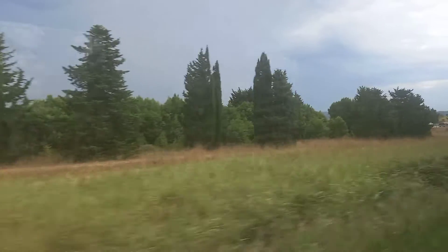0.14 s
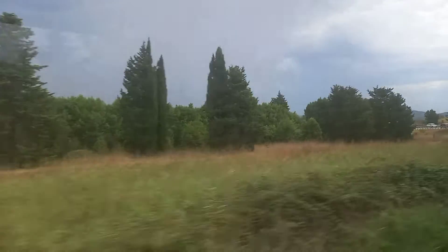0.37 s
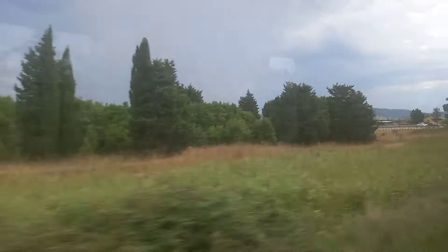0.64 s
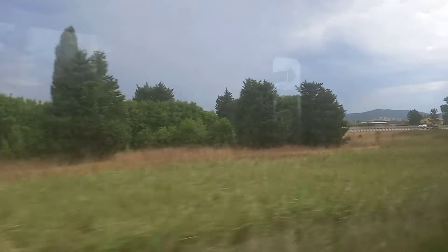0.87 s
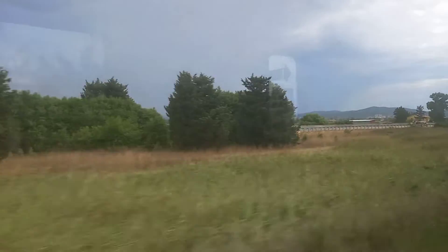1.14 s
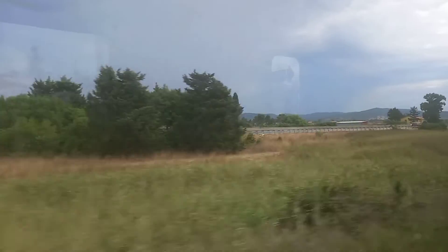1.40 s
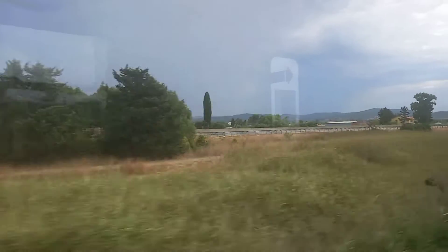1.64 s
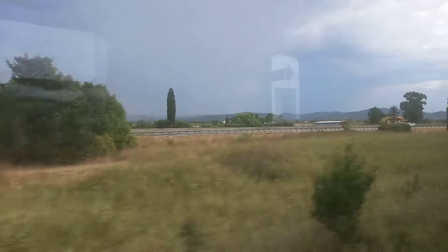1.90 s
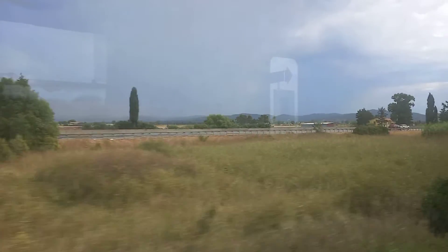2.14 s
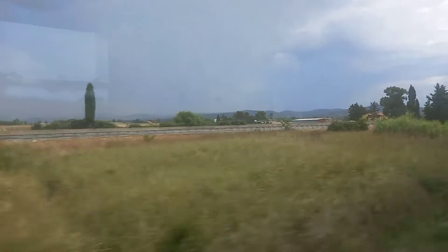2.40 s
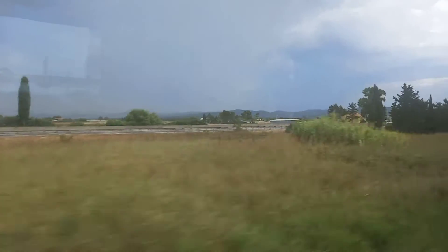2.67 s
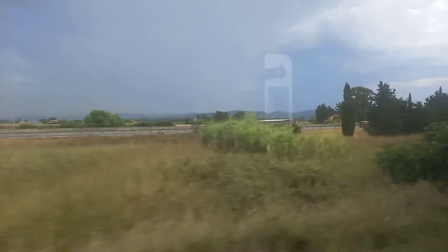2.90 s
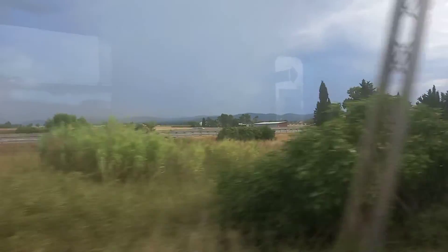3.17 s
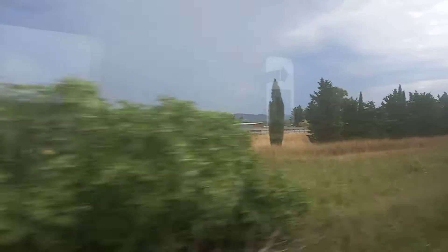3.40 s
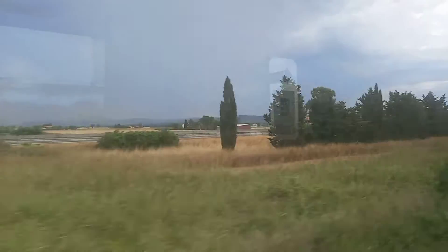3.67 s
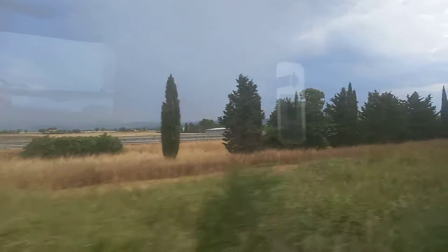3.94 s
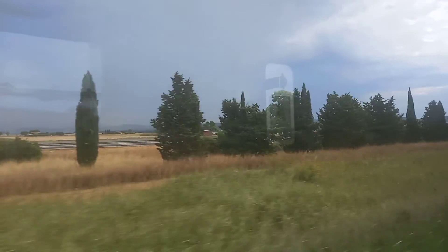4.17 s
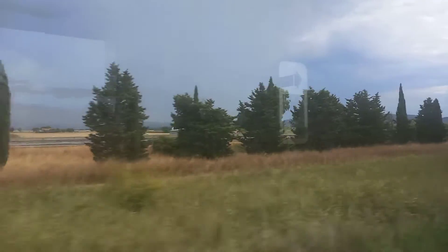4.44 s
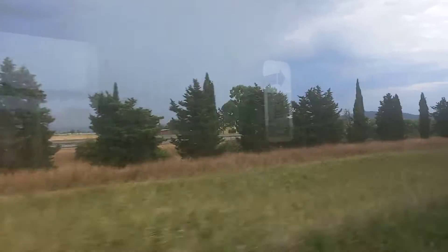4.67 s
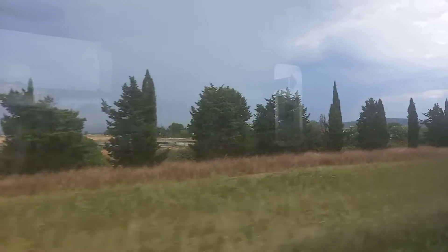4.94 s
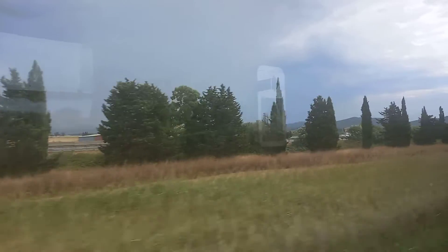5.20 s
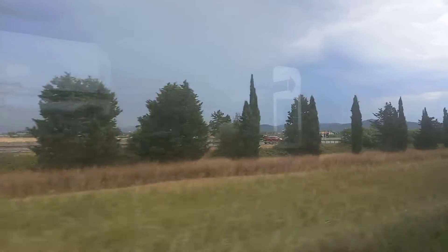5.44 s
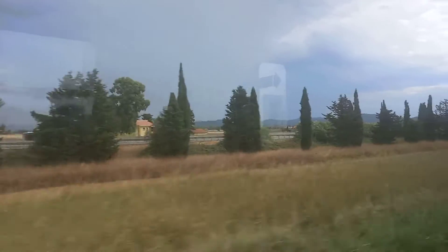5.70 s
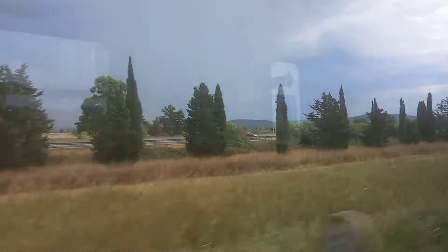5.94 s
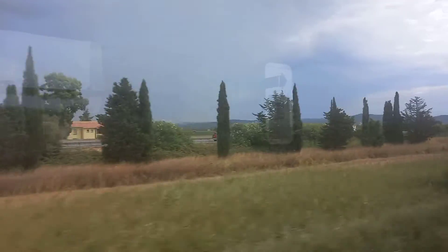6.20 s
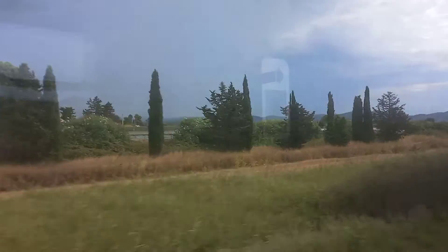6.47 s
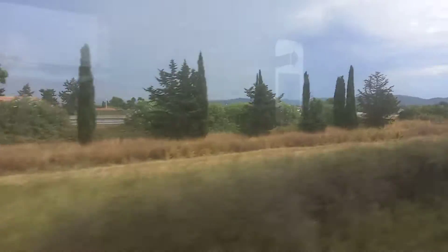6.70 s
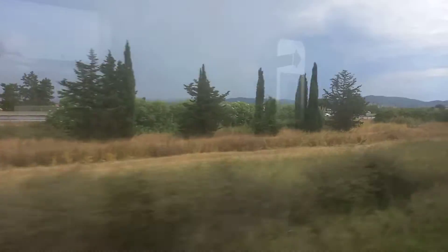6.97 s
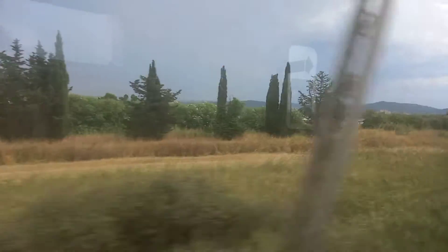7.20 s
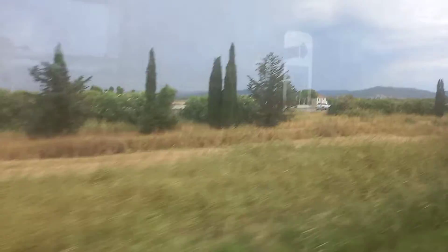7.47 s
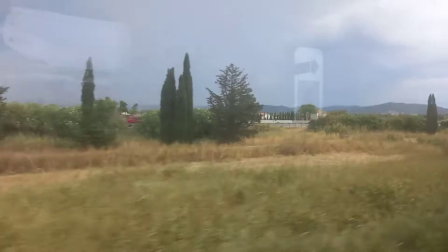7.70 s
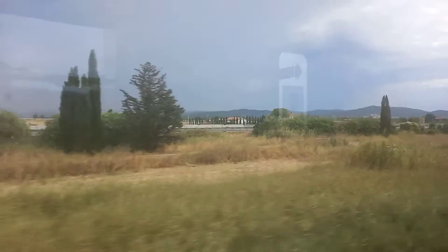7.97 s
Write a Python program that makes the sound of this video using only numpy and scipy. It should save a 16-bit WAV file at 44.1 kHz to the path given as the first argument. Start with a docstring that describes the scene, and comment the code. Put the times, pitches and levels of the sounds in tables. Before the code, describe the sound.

Inside a fast train carriage, a steady deep rumble with wavering low hums, soft airy hiss, loose trim rattling, and a loud phone knock near the end.

```python
"""Passenger carriage at speed

Inside a carriage on open track, heard by a hand-held phone near the window through its two ports.
Filtered noise makes the wheels' roar, their ring, the rush from the trackside and the air at the seals.
Narrow wavering resonances make the boom and hums of the car body. Jolts shake loose fittings into bursts
of dense clicks with small metal pings, and harder parts clack as short noise strikes.
Late on a finger ticks and knocks on the phone itself: tiny wave packets, a falling thud and a sharp edge.
"""
import sys
import numpy as np
from scipy import signal
from scipy.fft import rfft, irfft, next_fast_len
from scipy.io import wavfile
from scipy.ndimage import uniform_filter1d

SR = 44100
rng = np.random.default_rng(int(sys.argv[2]) if len(sys.argv) > 2 else 0)


def store_pcm(level_fs):
    """Save levels as 16-bit WAV."""
    pcm = np.round(np.clip(level_fs, -1, 1) * 32767).astype(np.int16)
    wavfile.write(sys.argv[1], SR, np.atleast_2d(pcm).T)


def boost_factor(decibels):
    """Convert a level in decibels to a linear amplitude factor."""
    exponent = np.asarray(decibels, float) / 20
    return 10 ** exponent


N = 357210
SIZE = next_fast_len(N)
HZ = np.maximum(np.arange(SIZE // 2 + 1) * SR / SIZE, 1)
T = np.arange(N) / SR

# How the two ports share a sound. Each row: frequency in Hz, left minus right in dB.
PORT_BALANCE = [(50, .5), (150, 0), (300, 1.5), (480, 4), (650, 5), (1000, -4), (1400, -1.5), (2100, 4.5),
                (3200, -0.5), (4600, -7.5), (5800, 3.5), (7600, 17), (8700, -5.5), (9100, -16.5),
                (10200, -20.5), (10800, -18.5), (15000, -18.5)]
# How alike the ports hear it. Each row: frequency in Hz, likeness from 0 to 1, left lead in radians.
PORT_LIKENESS = [(50, .995, .16), (75, .995, .12), (200, .98, .01), (310, .92, 0), (480, .85, -.35),
                 (650, .3, -.5), (900, 0, -.5)]

# Low boom of the car body. Each row: time in seconds, level in dB before its random drift.
BOOM_LEVEL = [(0.0, -25), (.35, -23.5), (1.0, -22.5), (2.21, -22.5), (2.26, -24.5), (2.36, -17),
              (2.56, -30.5), (2.78, -20.5), (3.06, -29.5), (3.17, -12), (3.23, -28), (4.04, -21.5),
              (4.18, -29.5), (4.24, -17.5), (4.32, -30.5), (4.77, -21), (4.83, -31), (5.3, -25),
              (6.34, -30.5), (6.52, -17.5), (6.67, -39), (6.78, -22.5), (7.3, -25.5), (7.54, -31.5),
              (7.81, -20.5), (7.85, -30.5)]
# Resonance of the boom: frequency in Hz, width in Hz.
BOOM_RESONANCE = (70.7, 16)
# Body hums. Each row: time in seconds, then low floor hum, high floor hum and wall drone in dB before drift.
HUM_LEVELS = [(0, -36, -29.5, -34.5), (1.83, -31, -38.5, -34.5), (2.5, -29.5, -35.5, -28),
              (2.9, -32.5, -29, -23.5), (3.3, -32.5, -29, -23), (3.5, -22, -31.5, -27),
              (3.88, -24.5, -25.5, -27), (4.2, -19, -23, -28.5), (4.37, -24, -36, -29),
              (4.45, -31, -30.5, -23.5), (5.05, -29, -35.5, -26.5), (5.2, -20.5, -28, -29),
              (5.33, -28.5, -23.5, -30), (5.8, -20, -25.5, -34), (6.0, -32, -26.5, -33.5),
              (6.15, -24.5, -21, -29), (6.38, -18, -22, -27), (6.6, -27.5, -23.5, -30.5),
              (7.08, -24.5, -18.5, -26), (7.2, -25.5, -25.5, -29.5), (7.87, -25, -29, -36),
              (8.1, -23.5, -29.5, -34.5)]
# Their resonances, in that order. Each row: frequency in Hz, width in Hz, evenness of swing from 0 to 1.
HUM_RESONANCES = [(229, 12, .7), (249, 7, .8), (283, 60, .15)]
HUM_WAVER = .005  # share by which the hums' pitch wanders
# A panel hums for a while. Each row: start in seconds, end in seconds, top level in dB,
# frequency in Hz, width in Hz.
PANEL_HUMS = [(2.944, 3.297, -30.5, 416, 25), (7.4, 7.802, -31.5, 368, 14)]

# Spectrum of the roar under the boom and hums. Each row: frequency in Hz, relative density in dB per Hz.
ROAR_SPECTRUM = [(26, -25.5), (40, -4), (65, -2.5), (110, -3), (185, -5), (250, -2), (340, -8.5),
                 (480, -12.5), (750, -15.5), (1050, -24), (1500, -32), (2500, -35.5), (3200, -46),
                 (4000, -59.5)]
# Panel resonances in the roar. Each row: frequency in Hz, width in Hz, dB above the noise around them.
PANEL_RESONANCES = [(408.9, 8.3, 7.5), (475, 17, 5), (719, 12, 3)]
ROAR_FLOOR_DB = -23
# Roar by the other ways in. Each row: time in seconds, through the walls in dB, through the window in dB.
ROAR_LEVELS = [(0, -33, -36.5), (.8, -28.5, -34.5), (1.5, -28, -35), (2.45, -29, -37), (2.65, -30, -33),
               (3.2, -31, -35.5), (3.5, -30, -37), (4.24, -31.5, -36.5), (4.74, -28, -35.5),
               (5.57, -29.5, -36), (6.2, -30.5, -35.5), (6.6, -29.5, -36.5), (7.5, -30, -34.5),
               (8.1, -30.5, -34.5)]

# Spectrum of the wheels' ring. Each row: frequency in Hz, relative density in dB per Hz.
WHEEL_SPECTRUM = [(1300, -3.5), (1680, -7), (1800, 1), (2130, 2.5), (2300, -5), (2750, -9.5), (3300, -26.5)]
# Resonances of the wheels. Each row: frequency in Hz, width in Hz, dB above the noise around them.
WHEEL_RESONANCES = [(2070, 35, 4.5), (2690, 80, 3.7)]
# Level of the ring, which rush and draught follow. Each row: time in seconds, level in dB.
WHEEL_LEVEL = [(0, -43.5), (1.4, -43.5), (2.45, -44.5), (2.7, -43.5), (3.2, -40.5), (3.5, -46), (4.2, -45),
               (5.5, -45.5), (5.75, -46), (6.2, -43), (6.5, -46), (7.3, -45.5), (7.7, -43.5), (8.1, -47)]
# Drift of the ring between the ports, used about its mean. Each row: time in seconds, left minus right in dB.
WHEEL_BALANCE = [(0.0, 1.5), (1.2, 5), (2.9, 2.5), (5.2, 4), (8.1, 0.5)]

# Spectrum of the trackside rush. Each row: frequency in Hz, relative density in dB per Hz.
RUSH_SPECTRUM = [(1000, -1.5), (2600, -0.5), (3300, -1.5), (5000, -5), (6900, -14.5), (8600, -31)]
# Growth close to the track throws back more rush. Each row: start in seconds, end in seconds, lift in dB.
TRACKSIDE_GROWTH = [(2.55, 3.264, 1.5), (6.1, 6.4, 1), (7.58, 7.94, 1)]
# Spectrum of the air at the seals. Each row: frequency in Hz, relative density in dB per Hz.
DRAUGHT_SPECTRUM = [(6000, -0.5), (8600, -2.5), (11800, 1.5), (13000, -3.5), (13500, -7), (15600, -9)]
# Base levels at time zero, and follow in dB per dB of wheel ring about its mean.
RUSH_DB, RUSH_FOLLOW, RUSH_FADE_DB_PER_S = -45.5, 0.43, 0.32
DRAUGHT_DB, DRAUGHT_FOLLOW, DRAUGHT_FADE_DB_PER_S = -68.5, .5, 0.3

# Jolts that shake the fittings. Each row: time in seconds, drive of the bright part in dB,
# dull part above the bright in dB.
JOLTS = [(0.3476, -66.5, 9), (0.5307, -69.5, 4), (0.667, -56, 7.5), (0.85, -56.5, 9), (1.0994, -68.5, 12),
         (1.172, -67.5, -2), (1.874, -69, 5), (2.036, -68.5, 10), (2.236, -56.5, 9), (2.419, -58, 8.5),
         (2.545, -68.5, 9), (3.064, -66, 7.5), (3.125, -67, 7), (3.26, -73.5, 5), (4.292, -68.5, 4),
         (4.37, -67, 4), (4.4074, -69, 9.5), (4.458, -72.5, 4.5), (4.542, -72.5, 4), (4.66, -66.5, 11.5),
         (4.714, -62, 9), (4.827, -65, 8.5), (5.116, -63, 10), (6.231, -64.5, 8.5), (6.33, -68.5, 8),
         (6.411, -64.5, 9), (6.5934, -65.5, 13), (6.76, -64.5, 7.5), (7.283, -69, 5)]
# Bright part of the rattle. Each row: frequency in Hz, relative density in dB per Hz.
BRIGHT_SPECTRUM = [(7000, -12.5), (9000, -3.5), (11700, -0.5), (13600, -4.5), (15100, -4), (16000, -1.5)]
# Dull part of the rattle. Each row: frequency in Hz, relative density in dB per Hz.
DULL_SPECTRUM = [(1500, -18), (3000, -2), (4700, 8), (6000, 5), (7100, 3.5), (8600, -18.5)]
JOLT_S = 0.04  # the main shaking falls faster after this; the faint chatter builds at this pace
LINGER, LINGER_S = 0.14, 0.34  # faint chatter that goes on: share of the drive, decay in seconds
JOLT_COLOUR_DB = 1.8  # each jolt favours other parts
# Small metal parts ringing out of the chatter. Each row: start in seconds,
# envelope peak at the louder port in dB, frequency in Hz.
METAL_PINGS = [(0.699, -52, 11350), (0.714, -44, 5950), (0.863, -54, 12200), (4.663, -58, 11000),
               (5.117, -48, 6600)]
PING_S = .0035  # a ping swells for this long and decays at the same pace

# Single hard strikes. Each row: start in seconds, strength in dB before the strike envelope.
STRIKES = [(3.83, -31.5), (5.116, -29.5), (5.688, -33), (5.739, -28), (6.339, -29), (6.709, -30.5)]
# Spectrum of a strike. Each row: frequency in Hz, relative density in dB per Hz.
STRIKE_SPECTRUM = [(1100, -9.5), (2100, 6.5), (2800, 2.5), (3600, -4.5), (4700, -4), (6000, -11),
                   (7500, -14), (8300, -25), (12000, -37.5)]

# Fingernail ticks. Each row: centre in seconds, peak at the right port in dB, frequency in Hz.
NAIL_TICKS = [(7.5707, -39, 11500), (7.5895, -24, 14200), (7.6117, -46, 12500)]
# Knock on the case near the left port. Each row: start in seconds, left strength in dB before its envelope,
# starting pitch in Hz, time to fall by 60 dB in seconds.
CASE_KNOCK = [(7.9105, 7.5, 98, .085)]
# Sharp edge of the knock. Each row: peak time in seconds, right peak in dB before rounding,
# time constant of the rise in seconds.
KNOCK_SNAP = [(7.9157, -3, .0006)]
# The case rings at the snap: frequency in Hz, spread in seconds, left peak in dB.
CASE_RING = (1300, .0006, -26)


def on_hz(table, column=1):
    """A column of a frequency table, joined on a log axis."""
    rows = np.array(table, float)
    return np.interp(np.log(HZ), np.log(rows[:, 0]), rows[:, column])


def colour(table, peaks=()):
    """Gain over frequency: a spectrum closed at both ends, with resonances on top."""
    below, above = (table[0][0] * .7, -90), (table[-1][0] * 1.1, -90)
    gain = boost_factor(on_hz([below, *table, above]))
    for hz, width, db in peaks:
        gain = gain * boost_factor(db / (1 + (2 * (HZ - hz) / width) ** 2))
    return gain


def curves(table):
    """The columns of a time table, one value a sample."""
    s, *columns = np.transpose(table)
    return [np.interp(T, s, column) for column in columns]


def unit(x):
    """Scale to rms 1."""
    return x / np.sqrt(np.mean(x ** 2))


def walk(rate):
    """Slow random drift of rms 1, from random steps at the given rate in Hz, smoothed twice."""
    k = int(SR / rate)
    steps = np.repeat(rng.standard_normal(N // k + 1), k)
    smooth = uniform_filter1d(uniform_filter1d(steps, k), k)
    return unit(smooth[:N])


def ports(a, b, gain):
    """Two unrelated fields reach the ports: shared in the bass, separate in the treble, each port coloured."""
    like = on_hz(PORT_LIKENESS)
    ratio = boost_factor(on_hz(PORT_BALANCE)) ** 2
    mid = rfft(a, SIZE) * np.sqrt((1 + like) / 2)
    side = rfft(b, SIZE) * np.sqrt((1 - like) / 2)
    lead = np.exp(1j * on_hz(PORT_LIKENESS, column=2))
    left = (mid + side) * np.sqrt(ratio / (1 + ratio)) * lead
    right = (mid - side) / np.sqrt(1 + ratio)
    pair = irfft(np.array([left, right]) * gain, SIZE)[:, :N]
    return pair / np.sqrt(np.mean(pair.mean(axis=0) ** 2))  # the mean of the ports has rms 1


def noise(gain, flicker_db, rate):
    """Octave bands of noise, each flickering on its own."""
    out = 0
    for hz in 30 * 2. ** np.arange(10):
        band = np.cos(np.clip(np.log2(HZ / hz), -1, 1) * np.pi / 2) * gain
        if np.max(band) > np.max(gain) / 300:  # skip bands too faint to matter
            power = np.sqrt(np.sum(band ** 2))
            flicker = boost_factor(flicker_db * walk(rate))
            out = out + power * flicker * ports(*rng.standard_normal((2, N)), band)
    return out / np.sqrt(np.mean(out.mean(axis=0) ** 2))


def mode(hz, width, steady):
    """A resonance kept ringing by rail roughness: the pitch wavers, the swing is fairly even."""
    response = 1 / (1 + (2 * (HZ - hz) / width) ** 2)
    ring = irfft(rfft(rng.standard_normal(SIZE)) * response, SIZE)
    swing = np.abs(signal.hilbert(unit(ring)))
    return unit(ring / (swing + 0.069) ** np.clip(steady, 0, 1))[:N]


def growth_db():
    """Lift of the rush where growth stands close to the track, with soft edges."""
    edge_s = 0.031
    return sum(db / 2 * (np.tanh((T - start) / edge_s) - np.tanh((T - end) / edge_s))
               for start, end, db in TRACKSIDE_GROWTH)


def draught():
    """Air at the seals: fluttering high noise that rises and falls with the wheel ring."""
    wheel_db, = curves(WHEEL_LEVEL)
    swell_db = wheel_db - wheel_db.mean()
    air_db = DRAUGHT_DB + DRAUGHT_FOLLOW * swell_db - DRAUGHT_FADE_DB_PER_S * T + .6 * growth_db()
    return boost_factor(air_db) * noise(colour(DRAUGHT_SPECTRUM), flicker_db=2.1, rate=18)


def rush():
    """Rolling noise thrown back by the trackside, following the wheel ring and the growth outside."""
    wheel_db, = curves(WHEEL_LEVEL)
    swell_db = wheel_db - wheel_db.mean()
    rush_db = RUSH_DB + RUSH_FOLLOW * swell_db - RUSH_FADE_DB_PER_S * T + growth_db()
    return boost_factor(rush_db) * noise(colour(RUSH_SPECTRUM), flicker_db=1.3, rate=10)


def body():
    """The car body booms low down; floor, walls and panels hum at their own pitches."""
    boom_db = curves(BOOM_LEVEL)[0] + 1.5 * walk(12)
    pair = [boost_factor(boom_db) * mode(*BOOM_RESONANCE, steady=0.7) for _ in range(2)]
    for db, (hz, width, even) in zip(curves(HUM_LEVELS), HUM_RESONANCES):
        db = db + 0.78 * walk(2.98)
        # read faster or slower: the pitch wanders
        place = np.arange(N) + np.cumsum(HUM_WAVER * walk(4))
        pair = [x + boost_factor(db) * np.interp(place, np.arange(N), mode(hz, width, steady=even), period=N)
                for x in pair]
    for start, end, db, hz, width in PANEL_HUMS:
        swell = np.sin(np.pi * np.clip((T - start) / (end - start), 0, 1)) ** .5
        pair = [x + boost_factor(db) * swell * mode(hz, width, steady=0.57) for x in pair]
    return ports(*pair, 1) * np.sqrt(np.mean(pair[0] ** 2))


def roar():
    """Wheel on rail: the floor carries the deep roar, the walls its middle, the glass lets its upper part in."""
    wall_db, pane_db = curves(ROAR_LEVELS)
    # crossovers an octave-half wide, as angles: cosine keeps what lies below, sine what lies above
    wall, pane = (np.clip(2 * np.log2(HZ / hz), 0, 1) * np.pi / 2 for hz in (300, 540))
    deep = colour(ROAR_SPECTRUM) * np.cos(wall)
    panelled = colour(ROAR_SPECTRUM, PANEL_RESONANCES)
    out = boost_factor(ROAR_FLOOR_DB) * noise(deep, flicker_db=1.0, rate=7)
    out = out + boost_factor(wall_db) * noise(panelled * np.sin(wall) * np.cos(pane), flicker_db=0.7, rate=8)
    return out + boost_factor(pane_db) * noise(panelled * np.sin(pane), flicker_db=0.88, rate=8)


def wheels():
    """The wheels' ring: resonant noise that slowly leans from port to port."""
    wheel_db, = curves(WHEEL_LEVEL)
    lean_db, = curves(WHEEL_BALANCE)
    ring = boost_factor(wheel_db) * noise(colour(WHEEL_SPECTRUM, WHEEL_RESONANCES), flicker_db=0.8, rate=8)
    return ring * boost_factor(np.outer([.5, -.5], lean_db - lean_db.mean()))


def jolt_shake(s):
    """Shaking after a jolt: most of it stops at once, a fainter part lingers in the carriage."""
    t = np.maximum(T - s + 0.0047, 0)  # the shaking sets in just ahead of the listed time
    after = np.maximum(t - JOLT_S, 0)
    stop = np.exp(-after / 0.042) + 0.2 * np.exp(-after / 0.11)
    shake = (1 - np.exp(-t / 0.0082)) * np.exp(-t / 0.052) * stop
    return shake + LINGER * (1 - np.exp(-t / JOLT_S)) * np.exp(-t / LINGER_S)


def rattles():
    """Each jolt sets loose trim chattering: dense uneven clicks that start fast and die in the carriage."""
    shapes = [jolt_shake(s) for s, _, _ in JOLTS]
    bright = np.array([boost_factor(db) * shape for (_, db, _), shape in zip(JOLTS, shapes)])
    dull = np.array([boost_factor(db + dull_db) * shape for (_, db, dull_db), shape in zip(JOLTS, shapes)])
    # noise whose strength jumps every 30 samples
    jumps_db = 1.5 * rng.exponential(size=(2, N // 30 + 1)).repeat(30, axis=1)[:, :N]
    hits = rng.standard_normal((2, N)) * boost_factor(jumps_db)
    out = 0
    for shakes, gain in (bright, colour(BRIGHT_SPECTRUM)), (dull, colour(DULL_SPECTRUM)):
        # parts of every size chatter unevenly, each in its own time: third-octave bands
        for hz in 2000 * 2 ** np.arange(0, 3.2, 1 / 3):
            band = np.cos(np.clip(3 * np.log2(HZ / hz), -1, 1) * np.pi / 2) * gain
            share = np.sqrt(np.sum(band ** 2) / np.sum(gain ** 2))
            if share > .05:
                shake = boost_factor(JOLT_COLOUR_DB * rng.standard_normal(len(JOLTS))) @ shakes
                out = out + share * shake * boost_factor(2.2 * walk(70)) * ports(*hits, band)
    return out


def pings():
    """Small metal parts ring: a sine that swells and dies in milliseconds, quieter at one port."""
    out = 0
    for s, db, hz in METAL_PINGS:
        t = np.maximum(T - s, 0)
        ring = boost_factor(db) * t / PING_S * np.exp(1 - t / PING_S) * np.sin(2 * np.pi * hz * t)
        lean_db = on_hz(PORT_BALANCE)[int(hz * SIZE / SR)]
        out = out + np.outer([boost_factor(min(lean_db, 0)), boost_factor(min(-lean_db, 0))], ring)
    return out


def clacks():
    """A harder part strikes once: noise with a sharp start and a short tail."""
    fade = np.zeros(N)
    for s, db in STRIKES:
        t = np.abs(T - s)
        fade += boost_factor(db) * (T > s) * (0.35 * np.exp(-t / 0.0078) + 0.12 * np.exp(-t / 0.06))
    strikes = fade * rng.standard_normal((2, N))
    return ports(*strikes, colour(STRIKE_SPECTRUM)) * np.sqrt(np.mean(fade ** 2))


def nail_ticks():
    """Fingernail ticks: tiny bell-shaped packets of a high cosine."""
    return sum(boost_factor(db) * np.exp(-((T - s) / .00008) ** 2) * np.cos(2 * np.pi * hz * (T - s))
               for s, db, hz in NAIL_TICKS)


def case_knock():
    """The case is pushed in over milliseconds, then swings out ever slower as the finger loads it."""
    (s, db, hz, t60), = CASE_KNOCK
    t = np.maximum(T - s, 0)
    turns = hz * .07 * (1 - np.exp(-t / .07))  # the pitch falls with a 0.07 s time constant
    envelope = (1 - np.exp(-t / .006)) * np.exp(-np.log(1000) * t / t60)
    return -boost_factor(db) * envelope * np.sin(2 * np.pi * turns)


def knock_snap():
    """Sharp edge of the knock: builds, then lets go at once, rounded by the soft fingertip."""
    (s, db, rise), = KNOCK_SNAP
    snap = boost_factor(db) * np.exp(-np.abs(T - s) / np.where(T < s, rise, rise / 5))
    return uniform_filter1d(uniform_filter1d(snap, size=6), size=6)


def case_ring():
    """The case rings at the snap: a bell-shaped packet of a cosine."""
    s = KNOCK_SNAP[0][0]
    hz, spread, db = CASE_RING
    return boost_factor(db) * np.exp(-((T - s) / spread) ** 2) * np.cos(2 * np.pi * hz * (T - s))


def handling():
    """Ticks and a knock travel through the case, so each port gets its own share."""
    ticks, knock, snap, ring = nail_ticks(), case_knock(), knock_snap(), case_ring()
    left = knock + boost_factor(-9) * snap + ring + boost_factor(-36) * ticks
    right = boost_factor(-10) * knock + snap + ring / 2 + ticks
    return np.array([left, right])


def scene():
    """All sources as they reach the two ports."""
    bed = draught() + rush() + body() + roar() + wheels()
    return bed + rattles() + pings() + clacks() + handling()


def top_cut(x):
    """Nothing passes above the cut-off."""
    return signal.sosfilt(signal.butter(12, 16620, fs=SR, output="sos"), x)


def record(dry):
    """A steep low-pass, run both ways, cuts the top; full scale clips."""
    low_pass = signal.ellip(6, .1, 30, 15760, fs=SR, output="sos")  # edge in Hz: 15760
    cut = signal.sosfiltfilt(low_pass, dry)
    return top_cut(np.clip(cut, -1, 1))


dry = scene()
out = record(dry)
store_pcm(out)
```